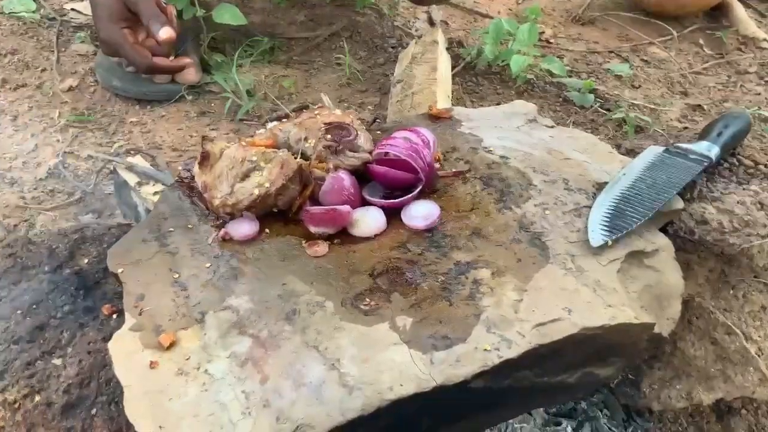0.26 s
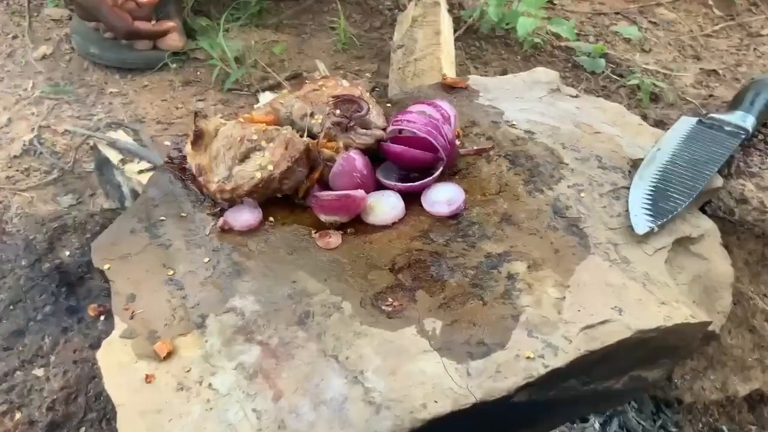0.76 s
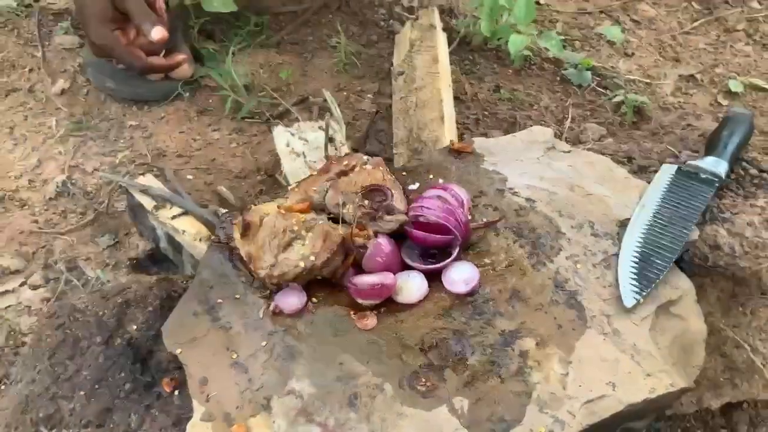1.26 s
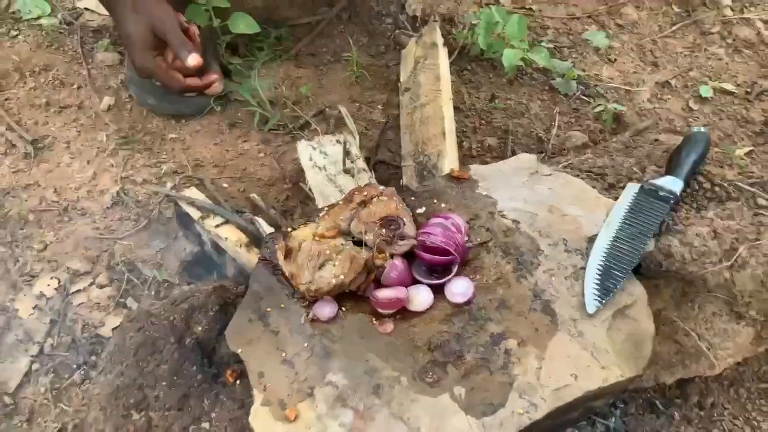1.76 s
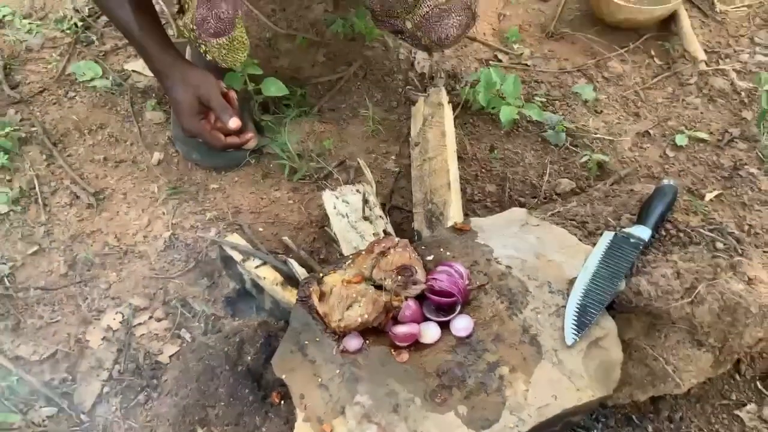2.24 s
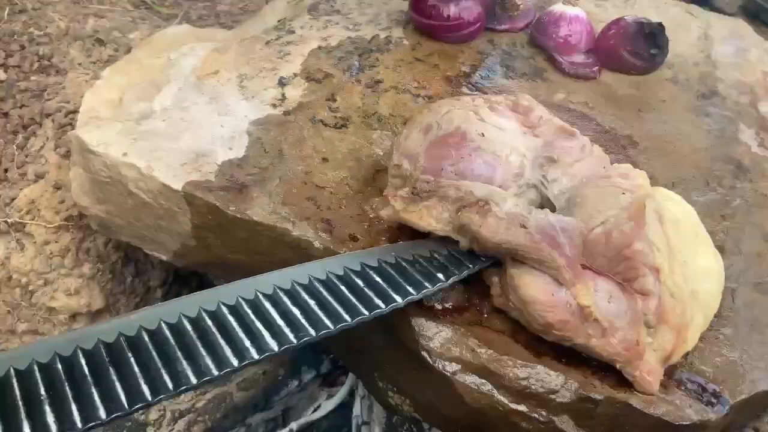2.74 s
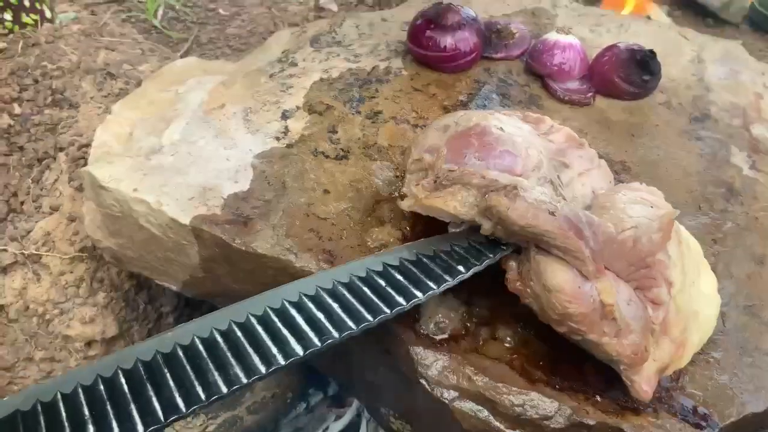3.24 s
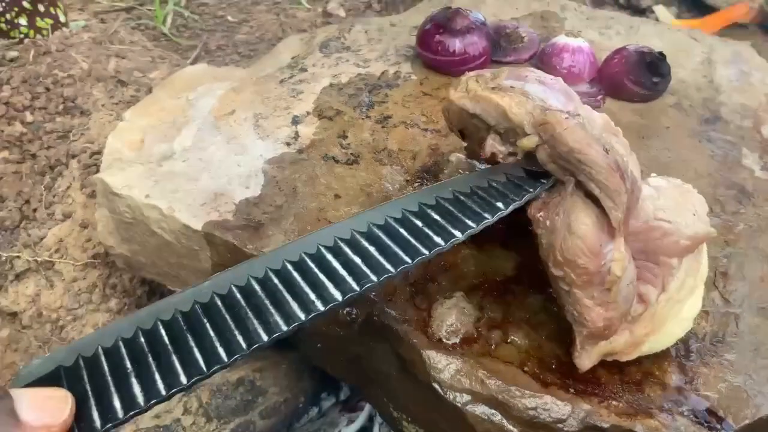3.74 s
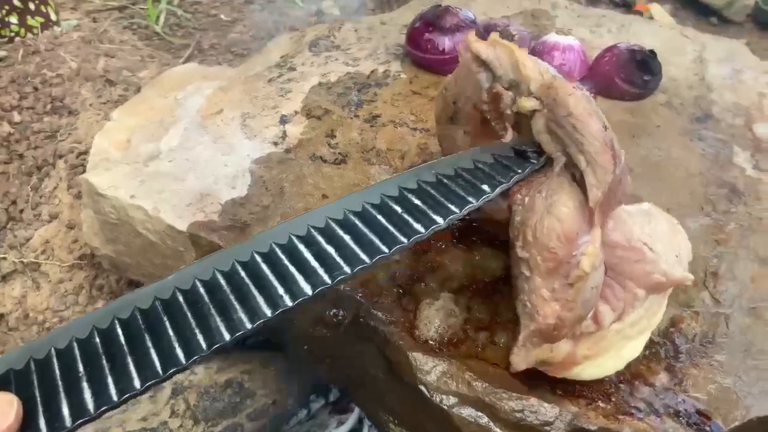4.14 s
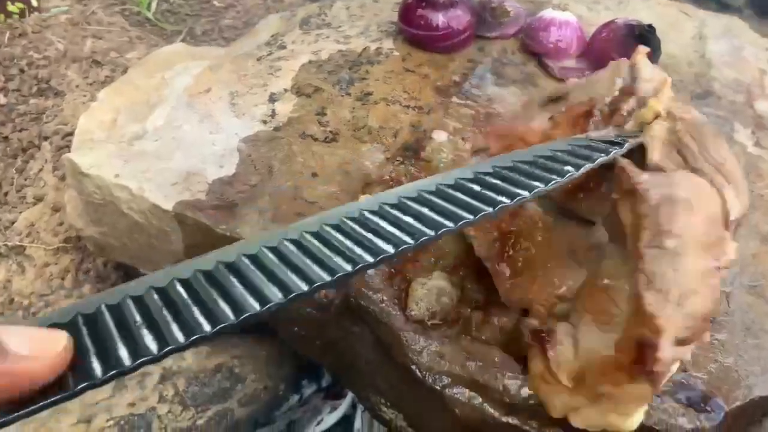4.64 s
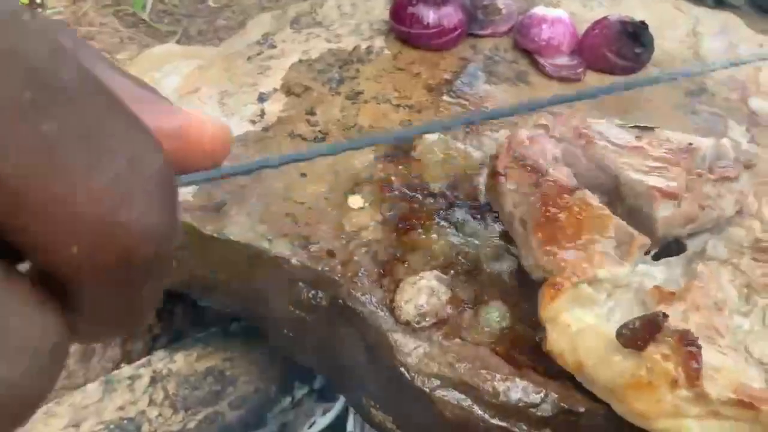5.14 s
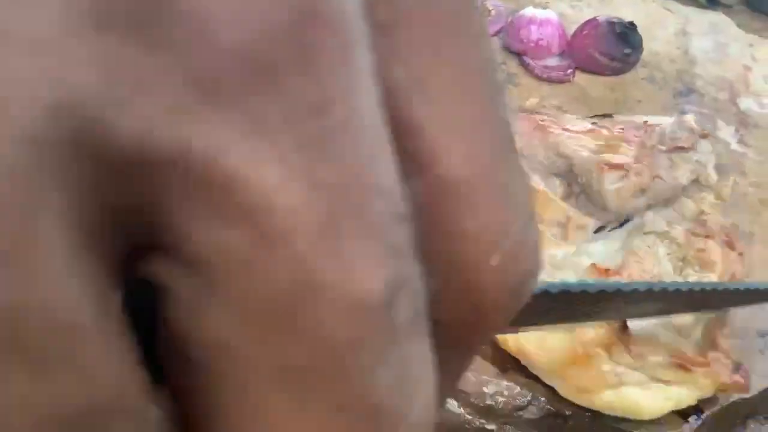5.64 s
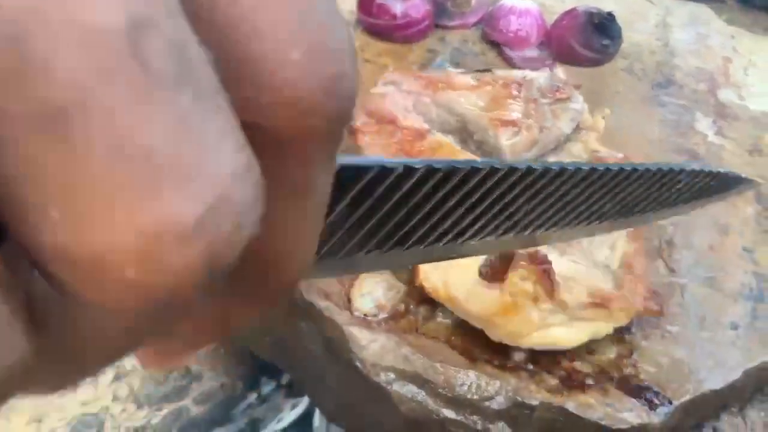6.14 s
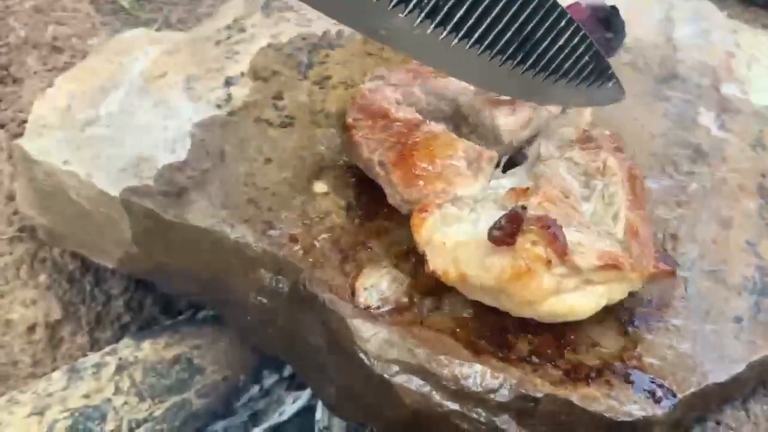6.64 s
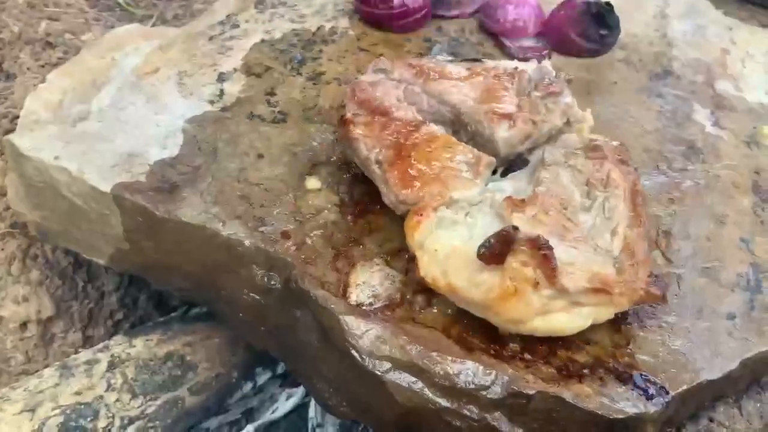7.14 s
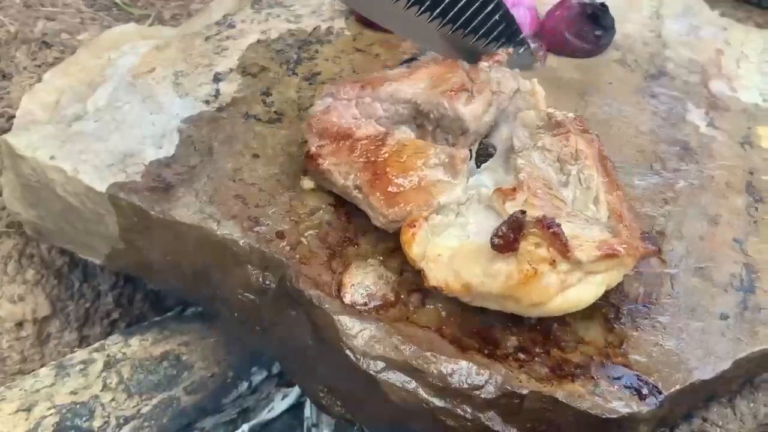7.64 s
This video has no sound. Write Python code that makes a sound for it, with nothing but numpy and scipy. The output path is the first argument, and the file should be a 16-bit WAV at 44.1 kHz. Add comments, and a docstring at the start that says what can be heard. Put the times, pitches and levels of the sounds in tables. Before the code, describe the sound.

Meat and onions sizzle on a hot rock outdoors, softly at first, then suddenly close and loud with sharp spitting pops and wind rumble.

```python
"""Frying meat and onions hiss, spit and bubble on a hot flat rock over an outdoor fire, first from a step
away, then close up while a knife turns the meat; single loud pops, knocks and wind rumble stand out.
Frying is random impulses of bursting steam, partly ringing as bubbles, split into four bands that follow the heat.
Pops and knocks are short band-limited clicks; fire and wind are coloured noise; eddies and low thumps are pulses.
Delayed cross-feed widens the stereo of the food, and a limiter holds down the loudest peaks."""
import sys
import numpy as np
from scipy import signal
from scipy.fft import rfft, irfft, next_fast_len
from scipy.io import wavfile
from scipy.ndimage import uniform_filter1d, minimum_filter1d

SR = 44100
rng = np.random.default_rng(int(sys.argv[2]) if len(sys.argv) > 2 else 0)


def wav_out(sig):
    """Save sig, one row per channel (or a flat mono array), as 16-bit PCM at SR to the path in sys.argv[1]."""
    wavfile.write(sys.argv[1], SR, np.round(np.clip(np.atleast_2d(sig).T, -1, 1) * 32767).astype(np.int16))


N = 347949

CLOSE_UP_S = 2.3272  # the listening point jumps to the meat
TIME = np.arange(N) / SR
SIZE = next_fast_len(N + 4096)  # transform length, padded so that filter tails do not wrap round
HZ = np.maximum(np.arange(SIZE // 2 + 1) * SR / SIZE, 1)


def from_db(db):
    """A level in decibels is twenty times the logarithm of the amplitude gain."""
    return 10 ** (np.asarray(db) / 20)


def rms_one(x):
    """Dividing by the root mean square gives unit power."""
    return x / np.sqrt(np.mean(x ** 2) + 1e-20)


def in_time(rows):
    """Linear interpolation turns each column of a curve into a value at every sample."""
    s, *columns = np.transpose(rows)
    return [np.interp(TIME, s, column) for column in columns]


def in_pitch(rows):
    """Interpolation over log frequency gives each column of a spectrum at every frequency."""
    hz, *columns = np.transpose(rows)
    return [np.interp(np.log(HZ), np.log(hz), column) for column in columns]


def shape(x, gain):
    """A linear filter multiplies the spectrum by a gain at each frequency."""
    return irfft(rfft(x, SIZE) * gain, SIZE)[..., :N]


def below(edge_hz, order=6):
    """Butterworth low-pass magnitude; its power complement is the matching high-pass."""
    return 1 / np.sqrt(1 + (HZ / edge_hz) ** (2 * order))


def drift(rate_hz):
    """Low-passed white noise is a slow random fluctuation, here with unit spread."""
    return rms_one(shape(rng.standard_normal(N), below(rate_hz, order=2)))


def air(colour, alike):
    """Stereo noise with a shared part (alike, share of power) is correlated between the ports."""
    white = rng.standard_normal((3, N))
    alike = np.clip(alike, 0, 1)
    stereo = np.sqrt(alike) * white[0] + np.sqrt(1 - alike) * white[1:]
    return rms_one(shape(stereo, from_db(in_pitch(colour)[0])))


def even(noise):
    """Dividing by the short-term power holds a noise steady from one tenth of a second to the next."""
    power = uniform_filter1d(np.mean(noise ** 2, axis=0), size=SR // 10)
    return noise / np.sqrt(power + .05)


def snap(decay_s, band_hz, order):
    """A dry impact is a decaying broadband spray, flattened in spectrum and then band-limited."""
    age = np.arange(SR // 50) / SR
    spray = rfft(rng.standard_normal((2, len(age))) * np.exp(-age / decay_s))
    # equal magnitudes keep only the phases; a longer decay closes the tail
    spray = irfft(spray / np.abs(spray), len(age)) * np.exp(-age / (10 * decay_s))
    band = signal.butter(order, band_hz, "band", fs=SR, output="sos")
    sound = signal.sosfilt(band, spray)
    # the energy of unit power lasting one millisecond
    return sound / np.sqrt(np.sum(sound ** 2, axis=1, keepdims=True) / (.001 * SR))


def add(track, s, sound):
    """By superposition a short sound is summed into a track from time s."""
    start = round(s * SR)
    track[..., start:start + sound.shape[-1]] += sound


def fire():
    """Flames and open air are broadband turbulence, almost uncorrelated at the two ports."""
    # spectrum of flames and open air: pitch_hz, relative_level_db
    fire_colour = [(60, -33), (150, 8), (300, -1.5), (500, -5.5), (800, -10.5), (1800, -8), (2600, -54)]
    level_db = np.where(TIME >= CLOSE_UP_S, -52.5, -63)
    return from_db(level_db) * air(fire_colour, alike=0.06)


def wind():
    """Turbulent pressure on the ports: a wavering breeze, and gusts that rumble and flutter at their height."""
    # spectrum of the low rumble: pitch_hz, relative_level_db
    wind_colour = [(12, -25), (20, 2), (43, 6), (87, -1), (140, -9.5), (450, -56), (580, -69), (990, -120)]
    # spectrum of the flutter of a gust: pitch_hz, relative_level_db
    buffet_colour = [(40, -32), (100, 11), (230, 5), (350, -4), (520, -32), (900, -60)]
    # gusts that hit the ports: centre_s, width_s, rumble_db, flutter_db
    gusts = [(0.68, 0.021, -40, -64), (1.02, 0.038, -47, -70), (2.18, 0.024, -44.5, -56),
             (2.49, 0.033, -37.5, -46), (2.709, 0.017, -29, -27), (2.891, 0.035, -44, -39.5),
             (3.03, 0.064, -27.5, -37), (3.41, 0.073, -32.5, -47), (3.7, 0.034, -32.5, -42.5),
             (4.0, 0.23, -45, -47), (4.5, 0.035, -43, -68), (5.162, 0.015, -33.5, -48),
             (5.6, 0.038, -37, -67), (6.038, 0.043, -33, -99), (6.66, 0.078, -25.5, -57),
             (6.825, 0.08, -30, -38), (7.1, 0.054, -27.5, -38), (7.189, 0.03, -31, -26),
             (7.29, 0.054, -34.5, -49), (7.46, 0.068, -28.5, -48), (7.759, 0.014, -29, -53),
             (7.86, 0.035, -29.5, -44)]
    flutter_width_share = 0.4  # the flutter is narrower in time than the rumble
    close = TIME >= CLOSE_UP_S
    breeze = from_db(np.where(close, -43, -55.5) + 1.5 * drift(rate_hz=10))
    rumble, flutter = 0, 0
    for s, width, rumble_db, flutter_db in gusts:
        # a gust is heard only at the listening point where it is centred
        same_place = close == (s >= CLOSE_UP_S)
        away = np.where(same_place, (TIME - s) / width, np.inf)
        rumble = rumble + from_db(rumble_db) * np.exp(-.5 * away ** 2)
        flutter = flutter + from_db(flutter_db) * np.exp(-.5 * (away / flutter_width_share) ** 2)
    low_wind = np.hypot(breeze, rumble) * even(air(wind_colour, alike=0.89))
    return low_wind + flutter * even(air(buffet_colour, alike=0.7))


def eddies():
    """Each eddy that breaks on the ports is one soft pressure pulse: a cosine in a Gaussian window."""
    # strongest eddies inside the gusts: centre_s, pitch_hz, level_db
    pulses = [(2.975, 50, -24), (3.011, 65, -20), (3.096, 45, -21.5), (3.673, 55, -25), (6.604, 85, -21),
              (6.645, 45, -18.5), (6.705, 95, -23), (6.833, 45, -18), (7.172, 110, -19), (7.195, 160, -20)]
    half_length_cycles = 0.42
    out = np.zeros(N)
    age = np.arange(-SR // 25, SR // 25) / SR
    for s, hz, db in pulses:
        window = np.exp(-.5 * (age * hz / half_length_cycles) ** 2)
        add(out, s + age[0], from_db(db) * np.cos(2 * np.pi * hz * age) * window)
    return out


def thumps():
    """A low thump is a heavily damped oscillation: it swings back and dies within about a cycle."""
    # one as the listening point jumps, one in the wind, one the low thud under the knife knock:
    # start_s, pitch_hz, level_db (before the low-pass)
    low_thumps = [(2.3272, 43, -24), (2.704, 170, -25), (4.0805, 230, -27)]
    decay_cycles = 0.68
    out, age = np.zeros(N), np.arange(SR // 8) / SR
    for s, hz, db in low_thumps:
        add(out, s, from_db(db) * np.cos(2 * np.pi * hz * age) * np.exp(-age * hz / decay_cycles))
    return shape(out, below(360, order=2))


def knife():
    """The knife tip slips and knocks on the rock: a short contact force excites a wide band."""
    # knock of the tip and its bounce: start_s, level_db
    knocks = [(4.0797, 1.5), (4.0829, -10)]
    out = np.zeros((2, N))
    for s, db in knocks:
        add(out, s, from_db(db) * snap(decay_s=.0006, band_hz=[1100, 10000], order=1))
    return out


def pops():
    """A bursting drop releases pressure at once in three bands: bright crack, spit and duller plop."""
    # loudest drops of fat and water that burst: start_s, crack_db, spit_db, plop_db
    drops = [(0.023, -24, -31, -46), (0.1251, -40, -32, -31), (0.2113, -21, -39, -40),
             (0.5797, -36, -35, -29), (0.6107, -30, -31, -38), (0.787, -38, -32, -42),
             (0.8821, -26, -37, -32), (0.9026, -40, -29, -43), (0.9314, -28, -38, -29),
             (0.9515, -29, -36, -36), (1.0919, -25, -37, -47), (1.3471, -43, -33, -33),
             (1.36, -42, -37, -40), (1.5551, -28, -49, -48), (1.7343, -29, -37, -40),
             (1.9968, -33, -38, -33), (2.2716, -31, -45, -49), (2.3448, -17, -35, -33),
             (2.4264, -30, -34, -20), (2.4346, -13, -29, -36), (2.4505, -18, -28, -24),
             (2.674, -30, -38, -28), (2.793, -12, -35, -31), (2.9144, -15, -22, -30),
             (2.9406, -6, -11, -17), (3.0005, -15, -18, -30), (3.0279, -3, -15, -21),
             (3.1924, -16, -20, -24), (3.4531, -6, -18, -28), (3.5097, -10, -23, -35),
             (3.7566, -6, -14, -26), (3.8227, -9, -21, -34), (3.876, -4, -12, -23), (3.92, -25, -14, -36),
             (3.9434, -10, -23, -34), (3.9802, -14, -31, -39), (4.0484, -14, -19, -33),
             (4.1317, -16, -28, -38), (4.1821, -17, -38, -43), (4.214, -24, -32, -27),
             (4.2418, -16, -37, -43), (4.2608, -10, -25, -29), (4.2676, -12, -24, -35),
             (4.3257, -27, -30, -24), (4.457, -20, -41, -35), (4.5741, -15, -20, -22),
             (4.652, -16, -26, -36), (4.6691, -20, -20, -24), (4.6902, -17, -34, -29),
             (4.7634, -11, -24, -38), (4.77, -22, -28, -21), (4.8404, -7, -22, -34),
             (4.8639, -10, -23, -35), (4.9538, -11, -16, -35), (4.9699, -12, -16, -22),
             (5.0268, -11, -20, -25), (5.0338, -11, -26, -35), (5.0396, -11, -21, -26),
             (5.0547, -7, -22, -36), (5.1196, -14, -27, -37), (5.1331, -12, -29, -30),
             (5.1788, -16, -23, -22), (5.2247, -29, -20, -22), (5.2888, -7, -30, -38),
             (5.3075, -11, -25, -24), (5.3517, -18, -25, -29), (5.4488, -13, -25, -30),
             (5.499, -12, -26, -24), (5.5046, -11, -25, -37), (5.6434, -10, -31, -23),
             (5.6912, -9, -17, -25), (5.7782, -9, -29, -34), (5.838, -11, -27, -34),
             (5.8724, -11, -22, -34), (5.8778, -9, -21, -24), (5.9188, -9, -29, -34),
             (5.9272, -8, -29, -34), (5.965, -10, -24, -28), (6.2893, -7, -16, -22),
             (6.3393, -10, -31, -28), (6.7532, -22, -17, -26), (7.2085, -14, -16, -20),
             (7.67, -24, -34, -26), (7.7829, -11, -27, -36)]
    out = np.zeros((2, N))
    for s, crack_db, spit_db, plop_db in drops:
        add(out, s, from_db(crack_db) * snap(decay_s=.0004, band_hz=[8600, 16000], order=4))
        add(out, s, from_db(spit_db) * snap(decay_s=.0006, band_hz=[3800, 8500], order=2))
        add(out, s, from_db(plop_db) * snap(decay_s=.0008, band_hz=[950, 4200], order=2))
    return out


def hiss(patchy_db, patchy_hz):
    """Steam jets of different sizes are turbulent noise whose bands sputter independently."""
    white = rng.standard_normal((2, N))
    under = [0, *(below(hz) ** 2 for hz in (4800, 7400, 10600, 13700)), 1]
    jets = 0
    for low, high in zip(under, under[1:]):
        jets = jets + shape(white, high - low) * from_db(patchy_db * drift(patchy_hz))
    return rms_one(jets)


def crackles():
    """Splitting blisters of fat are a random point process in uneven runs, clicking at both ports together."""
    rate_per_s = 150 * from_db(5 * drift(rate_hz=12))
    born = rng.random(N) < rate_per_s / SR
    # sizes span 11 dB, most of them small
    sizes = from_db(11 * rng.random(N) ** 2) * rng.choice([-1, 1], (2, N))
    return rms_one(born * sizes)


def bursts(per_s, spread_db, clump_db):
    """Steam pockets burst as Poisson-like impulses in flurries; each port faces its own patch of fat."""
    born = rng.random((2, N)) < per_s / SR
    # log-normal sizes: many tiny, a few large, with a ceiling
    sizes = from_db(spread_db * np.minimum(rng.standard_normal((2, N)), 2.8))
    flurries = from_db(clump_db * (drift(15.0) + drift(480)) / np.sqrt(2))
    return rms_one(born * sizes * rng.choice([-1, 1], (2, N))) * flurries


def ringing(clicks, cycles, low_hz, high_hz, count=14):
    """Each impulse excites a damped resonator, a bubble of its own size, that falls 60 dB in so many cycles."""
    dealt = rng.integers(0, count, N)  # which resonator each click strikes
    out = 0
    for k, hz in enumerate(np.geomspace(low_hz, high_hz, count)):
        w = 2 * np.pi * hz / SR
        r = np.exp(-np.log(1000) * hz / (cycles * SR))
        struck = clicks * (dealt == k) + 1e-18  # the tiny offset keeps the filter state from underflowing
        out = out + signal.lfilter([w, 0, -w], [1, -2 * r * np.cos(w), r * r], struck)
    return rms_one(out)


def ticks(per_s, spread_db):
    """Droplets flashing to steam excite short high resonances, a little stronger at one port or the other."""
    born = rng.random(N) < per_s / SR
    shared_db = spread_db * np.minimum(rng.standard_normal(N), 1.8)
    sizes = from_db(shared_db + 2 * rng.standard_normal((2, N)))
    return ringing(born * sizes, cycles=20, low_hz=2440, high_hz=16000, count=24)


def spurts():
    """Trapped steam escaping from under the meat changes the levels along a half-sine arch, in dB."""
    # escapes of steam: start_s, length_s, fizz_rise_db, spit_rise_db, bubble_rise_db
    escapes = [(3.266, 0.16, 1.5, 3, 1), (3.57, 0.11, 4, 1, -1), (3.877, 0.16, 2.5, 0, 0.5),
               (4.179, 0.097, 4, 2, 0), (4.777, 0.066, 2, 1, -1), (5.018, 0.064, 3.5, -3, 1),
               (5.623, 0.072, -1, 2.5, 6.5), (5.698, 0.071, 2, 4.5, 2.5), (6.822, 0.19, 5.5, 2.5, 1),
               (7.51, 0.097, 2.5, 2, 2), (7.74, 0.12, 5.5, 0.5, 1.5)]
    total = np.zeros((3, N))
    for s, length, *rises in escapes:
        total += np.outer(rises, np.sin(np.pi * np.clip((TIME - s) / length, 0, 1)))
    return total


def juice():
    """Evaporation dries the rock under the meat at a constant rate in dB; turning the meat renews the juice."""
    turned_s = 4.765  # the meat falls on its other side and fresh juice reaches the rock
    fresh_db, drying_db_per_s = 7, 1.28
    return fresh_db * (TIME >= turned_s) - drying_db_per_s * np.maximum(TIME - CLOSE_UP_S, 0)


def levels(sizzle):
    """Boiling vigour drives all four band levels in dB; steam shifts them and juice shifts the lower two."""
    # level of the treble fizz over the coarser spitting: time_s, level_db
    treble = [(0, 11.5), (1.9, 8.5), (2.4, 11.5), (2.95, 8), (3.6, 13), (4.55, 7.5), (5.5, 8), (6.45, 8),
              (6.78, 4.5), (7.1, 7.5), (7.89, 5)]
    bubbling_follows = 0.34  # share of the sizzle's swing that the bubbling takes
    simmer_juice_share = 0.22  # share of the juice's effect on the low simmer
    vigour = in_time(sizzle)[0]
    steam_fizz, steam_spit, steam_bubbles = spurts()
    usual = np.mean(np.array(sizzle)[:, 1])
    boil = usual + bubbling_follows * (vigour - usual) + steam_bubbles
    surge = 1.09 * drift(rate_hz=29.3)  # the fizz surges and ebbs a little by chance
    fizz = vigour + in_time(treble)[0] + steam_fizz + surge
    wetness = juice()
    return fizz, vigour + steam_spit, boil + wetness, boil + simmer_juice_share * wetness


def frying(sizzle, colour, clicks, fizz_db, spit_db, bubble_db, simmer_db,
           fine_steam_db, coarse_steam_db, tick_db, ring_db):
    """Impulses, steam noise and resonances superpose, then crossovers split them into four levelled bands."""
    tone = from_db(in_pitch(colour)[0])
    steam = hiss(patchy_db=2.3, patchy_hz=160)
    droplets = from_db(tick_db) * ticks(per_s=1400, spread_db=4.5)
    crackle_db = -5  # against the bursting steam pockets

    fine = (clicks + from_db(fine_steam_db) * steam) * from_db(.9 * drift(40))
    fine = fine + droplets + from_db(crackle_db) * crackles()
    # a chance size for every click makes the spitting coarser
    coarse = clicks * from_db(2.8 * rng.standard_normal(N)) + from_db(coarse_steam_db) * steam
    coarse = coarse + droplets + from_db(crackle_db) * crackles()
    large = bursts(per_s=700, spread_db=5.5, clump_db=2.5)
    wet = coarse + from_db(ring_db) * ringing(large, cycles=9, low_hz=700, high_hz=5500)

    under_fizz, under_spit, under_bubbles = below(7560), below(2637), below(1553)
    under_simmer = below(210, order=3)
    fizz = rms_one(shape(fine, tone * np.sqrt(1 - under_fizz ** 2)))
    spit = rms_one(shape(wet, tone * under_fizz * np.sqrt(1 - under_spit ** 2)))
    bubbles = rms_one(shape(wet, tone * under_spit * np.sqrt(1 - under_bubbles ** 2)))
    simmer = rms_one(shape(wet, tone * under_bubbles * np.sqrt(1 - under_simmer ** 2)))
    layers = zip((fizz, spit, bubbles, simmer), levels(sizzle), (fizz_db, spit_db, bubble_db, simmer_db))
    return sum(layer * from_db(level + db) for layer, level, db in layers)


def widen(sound, ports):
    """Interaural-style delay: each channel gets the other port late; the right port is nearer to the food."""
    # lag of the cross-feed, about two thirds of a millisecond: pitch_hz, lag_cycles
    feed_lag = [(0, 0), (1000, .1), (1400, .5), (1800, .97), (2300, 1.3), (2490, 1.487), (2785, 1.509),
                (3250, 2), (3940, 2.5), (4900, 3.5), (6050, 4.5), (7400, 5.5), (9130, 6.5), (16790, 11.5)]
    left_db, feed, lean_db = in_pitch(ports)
    left_gain, feed, lean = from_db(left_db), np.clip(feed, 0, 1), from_db(lean_db / 2)
    cross = feed * np.exp(-2j * np.pi * np.interp(HZ, *np.transpose(feed_lag)))
    left, right = rfft(sound, SIZE)
    # each sum is divided by the root of its summed powers
    out_left = (left_gain * left + cross * right) / np.hypot(left_gain, feed)
    out_right = (right + cross * left_gain * left) / np.hypot(1, feed * left_gain)
    return irfft(np.array([out_left * lean, out_right / lean]), SIZE)[:, :N]


def scene():
    """Superposition of frying at two distances, pops, the knife, fire, wind, eddies and low thumps."""
    # colour of the frying from a step away and close up: pitch_hz, relative_level_db
    far_colour = [(450, -16.5), (800, -8.5), (1200, -9.5), (1600, -5.5), (2050, -0.5), (2900, -5),
                  (3500, 0.5), (4100, 2), (4900, -1.5), (6000, -2), (7400, -10), (9000, -2), (10500, 1),
                  (15500, -1.5)]
    near_colour = [(500, -26), (800, -20), (1150, -16.5), (1850, -14), (2220, -5.5), (2800, -8.5),
                   (3400, -5.5), (4100, -1.5), (4700, -3.5), (5300, 0), (7000, -7.5), (8400, -5),
                   (9700, -0.5), (15500, 1.5)]
    # how hard the food fries, from a step away: time_s, level_db
    far_sizzle = [(0, -42.5), (.65, -39.5), (1.4, -41.5), (2.32, -44.5)]
    # close up; it sinks as the knife lifts the meat and swells as the fresh side settles: time_s, level_db
    near_sizzle = [(2.33, -32), (2.68, -31.5), (2.9, -27), (3.3, -28.5), (3.95, -31), (4.17, -34.5),
                   (4.45, -34), (4.73, -31), (4.8, -28.5), (4.98, -26), (5.3, -31), (5.55, -28.5),
                   (5.72, -24), (6.15, -23), (6.4, -25), (6.95, -26), (7.55, -26.5), (7.89, -27)]
    # the two ports at each place: pitch_hz, left_against_right_db, cross_feed (0-1), left_minus_right_db
    far_ports = [(400, -2, .2, 2), (850, -3, .3, 5), (1300, -7, .7, 2), (1900, -7, .95, 0),
                 (2200, -7, .95, -2), (2500, -7, 1, 0), (2850, -7, 1, 0), (4000, -4, .8, 0),
                 (4800, -1, .2, -1), (6800, -1, .2, -1.5), (7350, -1, .45, -1.5), (8500, -2, .3, -1),
                 (9100, -7, .93, 0), (15500, -7.5, .98, 0)]
    near_ports = [(400, -3, .3, 3), (1150, -9, .7, 4), (1450, -7, .45, 3), (1900, -7, .95, -.5),
                  (2200, -7, .97, -2.5), (2480, -7, 1, 0), (2850, -7, 1, 0), (4000, -4, .95, -.5),
                  (6000, -3.5, .85, 1.5), (7600, -2, .27, 4), (8600, -2, .35, -.3), (9200, -7, .9, 0),
                  (10600, -7.5, 1, 0), (15500, -7.5, .97, 0)]
    close = TIME >= CLOSE_UP_S
    far = frying(far_sizzle, far_colour, bursts(per_s=12000, spread_db=4.0, clump_db=2.0),
                 fizz_db=-3.0, spit_db=-4.5, bubble_db=-4.5, simmer_db=-14.5,
                 fine_steam_db=4.0, coarse_steam_db=-2.0, tick_db=-7, ring_db=-13.5)
    near = frying(near_sizzle, near_colour, bursts(per_s=12000, spread_db=2.5, clump_db=2.0),
                  fizz_db=1.0, spit_db=-2.5, bubble_db=-10.5, simmer_db=-17.5,
                  fine_steam_db=7.0, coarse_steam_db=-1.5, tick_db=-8.0, ring_db=-10.0)
    impacts = pops() + knife()
    food = widen(~close * (far + impacts), far_ports) + widen(close * (near + impacts), near_ports)
    return food + fire() + wind() + eddies() + thumps()


def record(dry):
    """Gain reduction holds for a moment after an overload; saturation rounds peaks and a low-pass cuts the top."""
    hold, cutoff_hz = SR // 100, 15780  # hold in samples
    needed = np.minimum(1, 1.6 / (np.abs(dry).max(axis=0) + 1e-9))
    # the window looks mostly back, with a few samples of look-ahead
    held = minimum_filter1d(needed, hold, origin=hold // 2 - 20)
    limited = dry * uniform_filter1d(held, size=24)
    rounded = limited / (1 + limited ** 6) ** (1 / 6)
    return shape(rounded, 1 / np.sqrt(1 + np.minimum(HZ / cutoff_hz, 2) ** 400))


dry = scene()
out = record(dry)
wav_out(out)
```